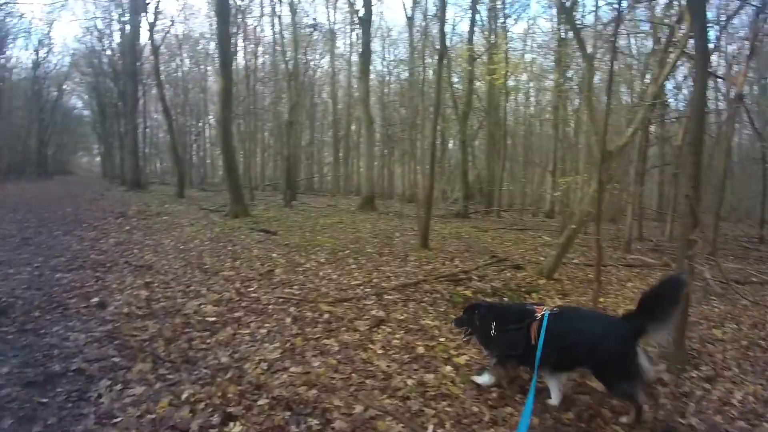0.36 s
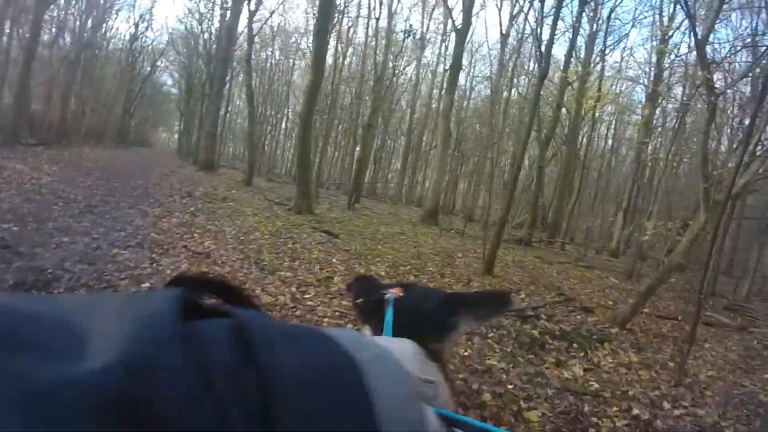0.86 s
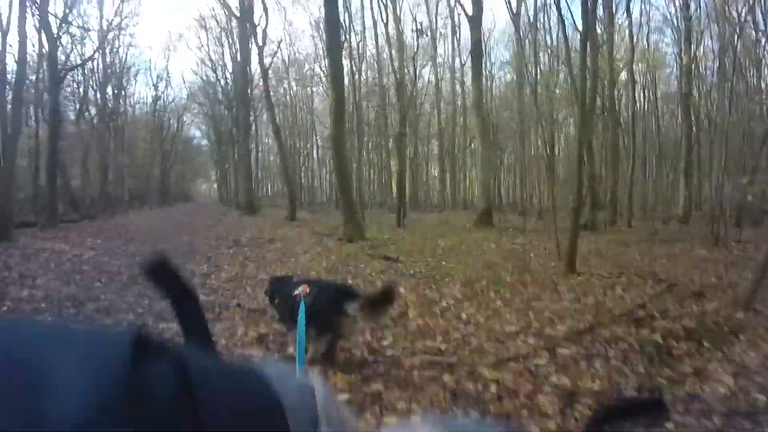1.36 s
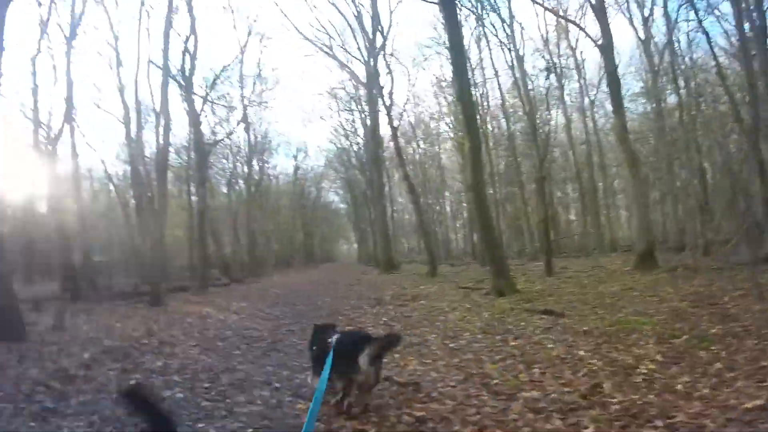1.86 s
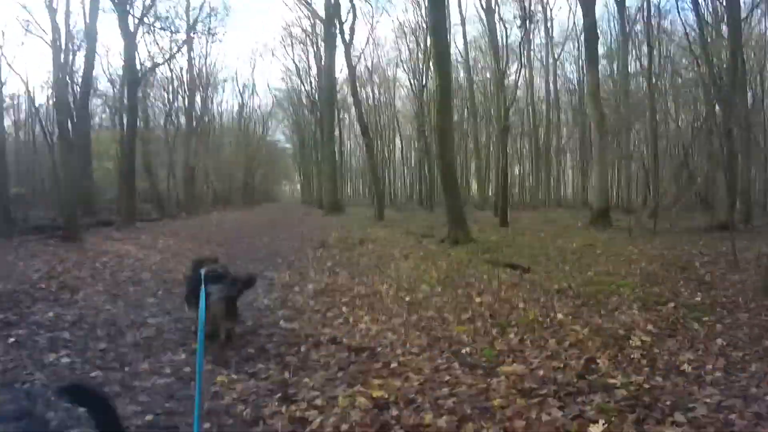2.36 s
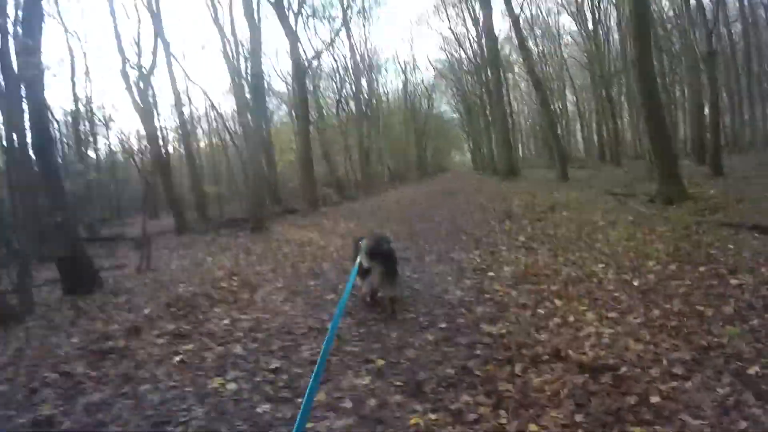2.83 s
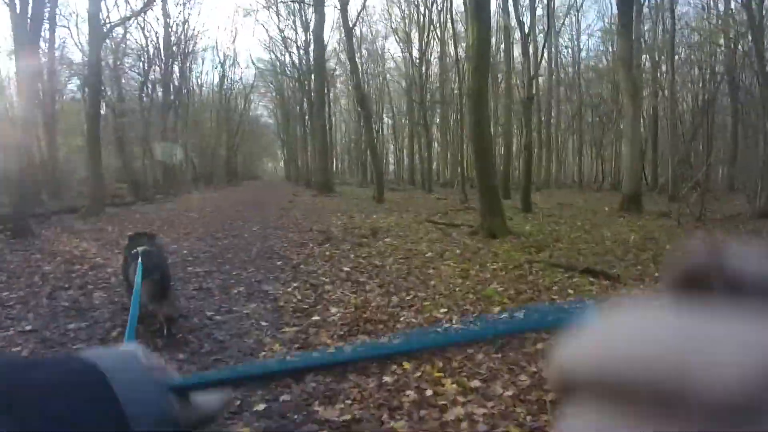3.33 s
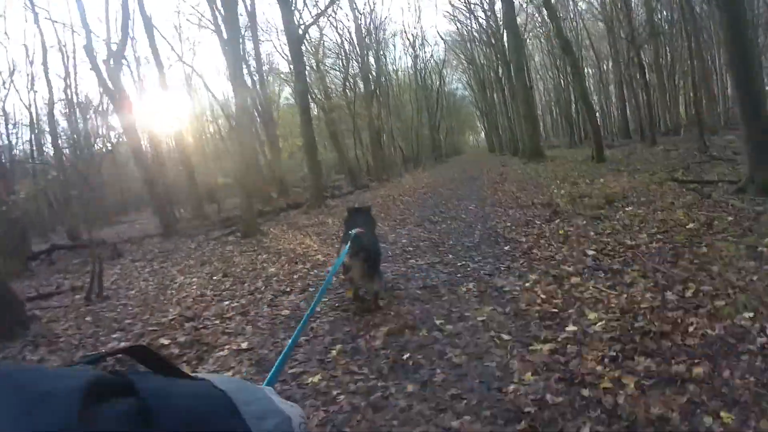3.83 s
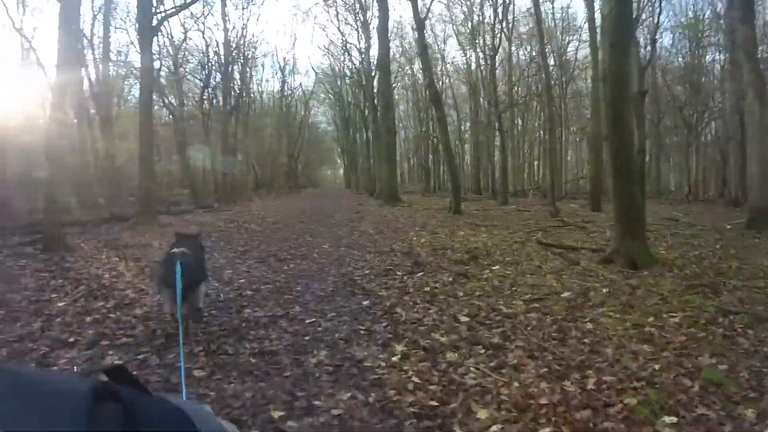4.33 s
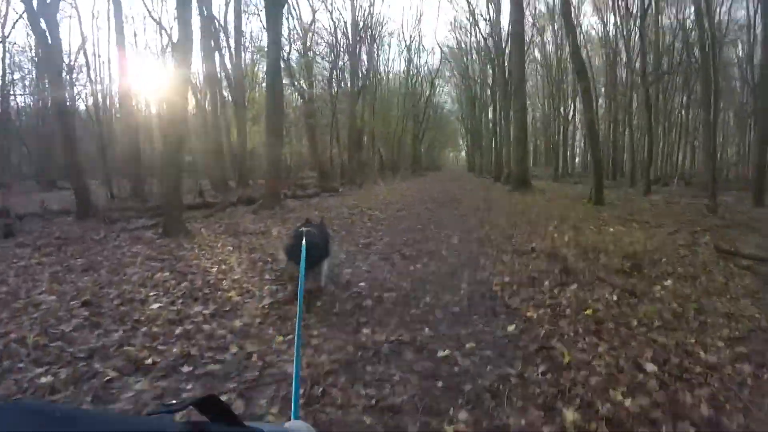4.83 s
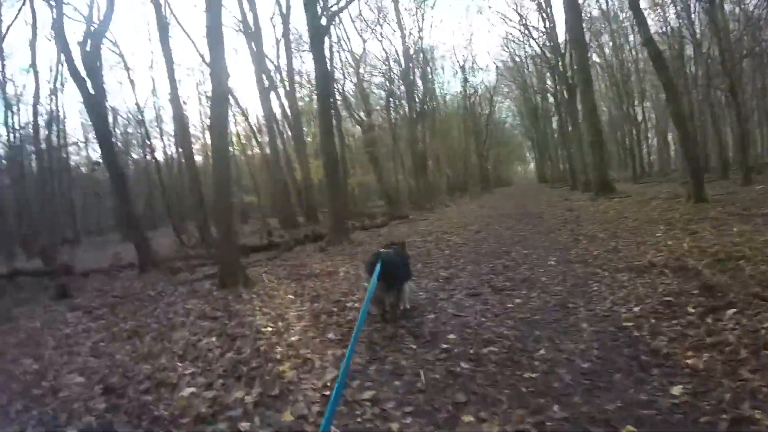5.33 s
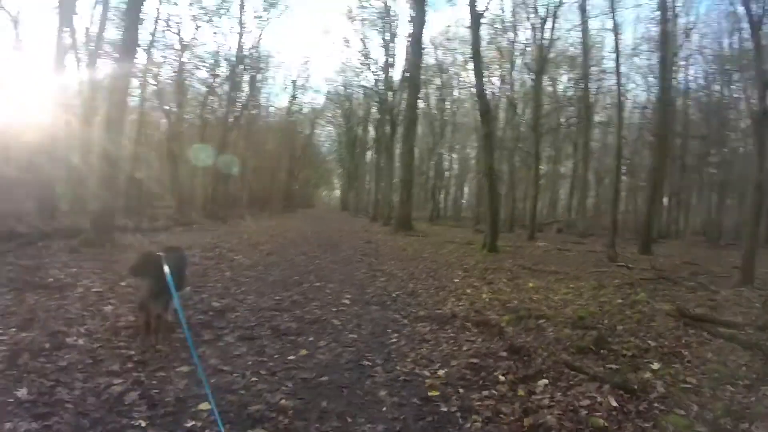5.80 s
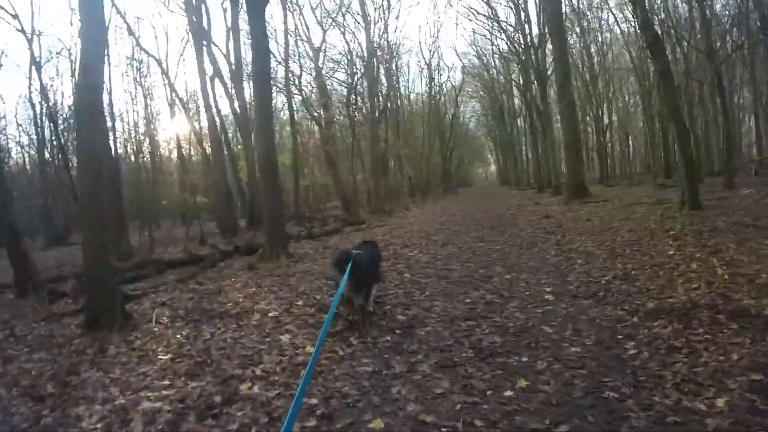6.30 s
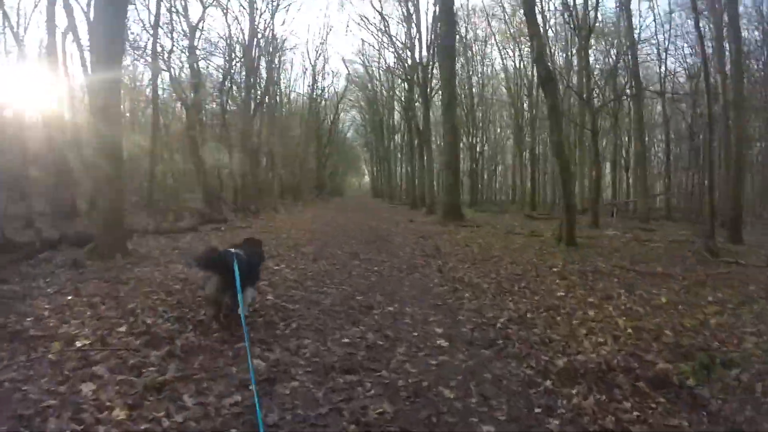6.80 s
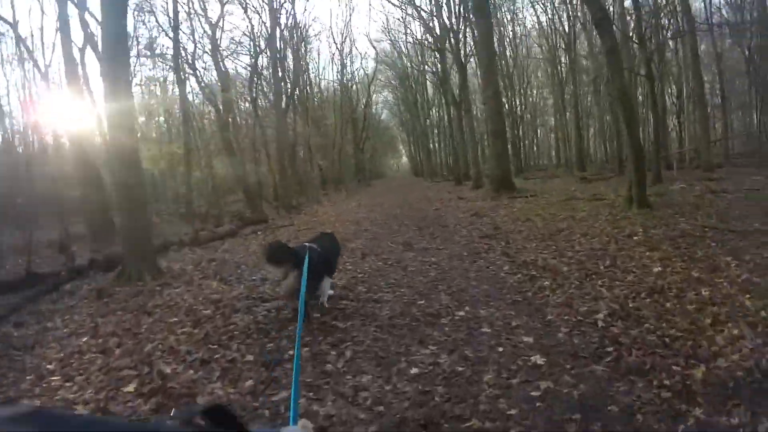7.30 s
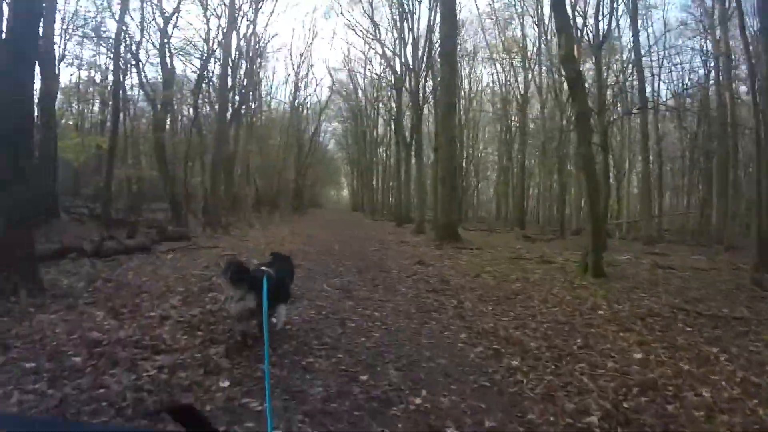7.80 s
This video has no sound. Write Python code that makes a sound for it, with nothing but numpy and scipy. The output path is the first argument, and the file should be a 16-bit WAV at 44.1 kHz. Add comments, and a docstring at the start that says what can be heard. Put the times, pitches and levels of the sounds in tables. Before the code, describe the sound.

Very close, boxy sound from a cased microphone on a jogger's chest. Light ticks and a soft leaf scuff come first, then irregular strides with dry rustling, clothing friction, hard plastic knocks and low thumps. Later strides are louder and crunchier, with a few sharp clipped cracks. Faint woodland air, hiss and an extremely thin high whine lie underneath. The dog ahead is not heard.

```python
"""Woodland floor of dry leaves: someone jogs behind an unheard dog, a small camera in a plastic case on the chest.
Knocks and snaps are ragged noise pushes, leaf and cloth scuffs are clumped noise; both ring the case wall.
Dull bumps are short low sines, and each stride lands as one deep swing over a rumble.
Faint air, hiss and a thin high whine lie beneath; the hardest knocks overload the input."""
import sys
import numpy as np
from scipy import signal
from scipy.fft import rfft, irfft, next_fast_len
from scipy.io import wavfile
from scipy.ndimage import uniform_filter1d

SR = 44100
rng = np.random.default_rng(int(sys.argv[2]) if len(sys.argv) > 2 else 0)


def attenuation_scalar(level_db):
    """Turn a level in dB into a linear amplitude multiplier (20 dB per decade)."""
    decades = np.asarray(level_db, float) / 20
    return 10 ** decades


def to_wav(s):
    """Save 16-bit WAV."""
    ch = np.atleast_2d(s).T  # columns
    pcm = np.round(np.clip(ch, -1, 1) * 32767)  # PCM
    wavfile.write(sys.argv[1], SR, pcm.astype(np.int16))


N = 359856

# Resonances of the case wall. Each row: frequency in Hz, width in Hz, level in dB.
WALL_MODES = [(304, 45, -5), (569.3, 58, 1), (825, 98, 5), (1384, 36, -7), (1823, 38, -3.5),
              (1992, 255, -4.5), (2526, 100, -5), (2969, 85, -2.5), (3790, 300, -12), (4350, 79, -23),
              (5030, 190, -18), (5850, 360, -16), (6330, 140, -16), (7200, 200, -23), (9100, 830, -19.5),
              (11050, 960, -22.5)]
# What the wall passes between its resonances. Each row: frequency in Hz, level in dB.
WALL_FLOOR = [(60, -15.5), (150, -9), (450, -11), (1100, -4.5), (1600, -21), (3100, -8.5), (3350, -34),
              (4400, -8.5), (4800, -24), (7000, -25.5), (7600, -49), (11300, -13), (12200, -73),
              (16000, -83)]
# Frequencies in Hz where the five regions of the wall meet.
REGION_EDGES_HZ = (450, 1500, 3300, 7000)

# Knocks and snaps. Each row: start in seconds, clack peak in dB, knock peak in dB against the clack,
# tick peak in dB against the clack, fall to 1/e in ms.
KNOCKS = [(0.3474, -21.5, -13.5, -15, 1.7), (0.3923, -32, -9, -6, 2.2), (0.4594, -35.5, -4, -10, 1.8),
          (0.5387, -22.5, -9, -17, 2.7), (0.6005, -26, -14, -16, 1.3), (0.7555, -22, 9, -22, 5.4),
          (0.851, -4.5, 0.5, -19, 2.8), (0.97, -12.5, -8, -13, 4), (1.0713, -26, 5.5, -19, 1.7),
          (1.1198, -24.5, -7, -10, 1.6), (1.1847, -13, -1, -24, 2.9), (1.2121, -20.5, 0, -16, 2.2),
          (1.2346, -18.5, -9, -22, 1.2), (1.3118, -34, 2, -12, 2.2), (1.3484, -24, -18, -22, 2.2),
          (1.4851, -14.5, -11, -9.5, 1.9), (1.5075, -12, -17, -14, 1.7), (1.5291, -17, -8, -19, 1.9),
          (1.7578, -16.5, -10, -11, 3.4), (1.8332, -11, -11, -19, 5.4), (1.9946, -15.5, -6, -11, 0.73),
          (2.0248, -23, -7, -4, 2), (2.0462, -30, -10, 2, 2.2), (2.0819, -9, -6, -16, 1.7),
          (2.1108, -16, -0.5, -12, 2.2), (2.1354, -23, 1, -8, 1.8), (2.1581, -12.5, 0, -8, 1.8),
          (2.2561, -3.5, -13, -13.5, 2.4), (2.3134, -18.5, 1, -25, 3.8), (2.364, -15.5, 0.5, -12, 1.9),
          (2.39, -18.5, -8, -8, 2.2), (2.6617, -15, -14, -16, 2.4), (2.6752, -17, -2, -26, 2.8),
          (2.7002, -13, -3, -23, 1.8), (2.7266, -16.5, -9, -13, 1.2), (2.7566, 0, 0.5, -6, 1.8),
          (2.795, -6.5, -0.5, -12, 2.4), (2.8145, -17, -9, -20, 2.2), (2.9908, -22.5, -11, -12, 2.2),
          (3.0689, -18, 2, -13, 2.9), (3.0937, -8.5, -8, -10.5, 4), (3.1357, -7.5, -6.5, -11.5, 3.1),
          (3.2017, -12, -6, -14.5, 3.7), (3.2306, -17.5, -1, -12, 3.6), (3.252, -19, -3, -16, 2.2),
          (3.3578, -15, 0.5, -15, 2.4), (3.4066, -14, -5.5, -27, 1.8), (3.5224, -13.5, -6.5, -26, 2.2),
          (3.681, -27, 3, -5, 3.5), (3.701, -12.5, 0, -8.5, 3.5), (3.73, -21, -4, -24, 2.9),
          (3.7664, -19.5, -15, -13, 1.9), (3.8548, -17, -22, -26, 2.4), (3.9851, -17.5, -24, -18, 2.2),
          (4.1115, -13.5, -3.5, -7.5, 4.5), (4.2423, -26.5, 1, -20, 2.4), (4.3577, -3.5, 0, -14.5, 2.5),
          (4.4156, -11.5, -17, -25, 2.2), (4.5438, -17.5, 2.5, -10, 2.5), (4.568, -12.5, -14, -26, 1.3),
          (4.633, -18.5, 0.5, -9.5, 2.2), (4.8276, -28, -4, -25, 2.2), (4.8519, -17, -5, -13, 2.2),
          (4.8693, -17.5, -5, -7.5, 2.8), (4.9171, 7, -8.5, -8, 0.97), (4.966, -22, 4, -19, 3.7),
          (4.9898, -15.5, -8, -13, 2.5), (5.0064, -6.5, -2.5, -15, 2.2), (5.0346, 4.5, -4, -15, 0.88),
          (5.1427, -11, -7.5, -9.5, 2.4), (5.1673, -16.5, -3.5, -11.5, 2.2), (5.2874, -14.5, -0.5, -24, 4),
          (5.3363, -18.5, -14, -26, 1.3), (5.3971, -9.5, -9, -13, 6.6), (5.435, -18.5, -2, -11, 2),
          (5.4551, -8.5, -10, -13, 3.5), (5.65, -13, -5.5, -27, 2), (5.8175, -8, -4, -15, 1.6),
          (5.8328, -15.5, -9, -16, 3.5), (5.8591, -19.5, -1, -14, 2.8), (5.9366, -11.5, -6, -15, 1.6),
          (5.9779, -13, -13, -19, 2.1), (6.1623, -19.5, -17, -10.5, 3.9), (6.2437, -12, -6.5, -8, 1.4),
          (6.2753, -19, -16, -18, 2), (6.356, -20.5, 6, -7.5, 2.9), (6.5142, -28, -2, -14, 1.6),
          (6.573, -10, -8, -21, 0.82), (6.6733, -17, -2, -17, 2.6), (6.6839, -7.5, -7, -12, 2.2),
          (6.6967, -3.5, -4, -12, 2), (6.7048, -9, -0.5, -21, 2.2), (6.7235, -6.5, -5, -17, 3.1),
          (6.757, -12.5, 1, -19, 2.6), (6.843, -16.5, -2, -6, 2.9), (7.0447, -18, -9, -17, 2.4),
          (7.0575, -15, -1.5, -11, 2.5), (7.0689, -13, -4, -14, 2.2), (7.1247, 3, 2.5, -2.5, 2),
          (7.1556, -16, -9, -14, 2.6), (7.163, -10, -6, -13, 4.5), (7.178, -18.5, -1, -8, 2.2),
          (7.2145, -13, -3, -12, 1.5), (7.256, -14, -7, -15, 2.2), (7.335, -28, -2, -26, 1.8),
          (7.4819, -15.5, -6, -9, 3.4), (7.648, -9.5, -3.5, -12, 5.3), (7.9618, -16.5, -4, -14, 4),
          (8.0408, 3, 0.5, -5, 2.8), (8.074, -14, -5, -7, 3.3), (8.105, -11.5, 2, -2, 2.6)]
KNOCK_RISE_MS, KNOCK_PEAK_MS = 0.73, 0.85  # Gaussian swell; its top this long after the listed start

# Dull bumps of the case against the chest. Each row: time in seconds (onset is 4 ms earlier),
# level in dB ahead of the envelope.
THUDS = [(0.76, -12.5), (0.854, -13), (0.932, -14.5), (0.974, -26), (1.188, -31), (1.483, -17.5),
         (1.84, -33), (2.262, -12.5), (2.401, -26), (2.759, -10), (2.804, -8.5), (3.092, -13.5),
         (3.253, -15.5), (3.395, -17), (3.599, -28), (3.705, -19), (3.962, -17), (4.039, -12.5),
         (4.36, -9.5), (4.543, -12.5), (4.922, -4), (4.968, -13), (5.039, -3), (5.145, -16), (5.301, -23),
         (5.707, -20), (6.182, -19), (6.241, -16), (6.708, -11), (6.758, -13), (6.844, -17), (7.128, -3.5),
         (7.315, -20), (8.015, -12.5), (8.046, -6.5)]
THUD_HZ_AT_MINUS_17_DB, THUD_HZ_PER_DB, THUD_SPREAD_HZ = 304, 4.5, 10  # harder bumps sound higher
THUD_RISE_S, THUD_FALL_S = 0.00043, 0.0042

# Scuffs of leaves and cloth. Each row: top in seconds, rustle in dB, low body in dB,
# rustle rise over 20 dB in ms, rustle fall over 20 dB in ms.
SCUFFS = [(0.541, -44, -41, 140, 900), (0.848, -33.5, -32, 90, 37), (0.925, -37, -36.5, 25, 201),
          (1.08, -37.5, -37, 12, 200), (1.239, -31, -28.5, 198, 16), (1.344, -30.5, -30, 45, 189),
          (1.512, -32, -32, 66, 41), (1.693, -36, -34, 204, 292), (1.844, -30.5, -33, 35, 68),
          (2.102, -28, -26, 134, 140), (2.257, -31.5, -30, 67, 53), (2.377, -35.5, -29, 127, 82),
          (2.563, -39.5, -35, 177, 104), (2.681, -30.5, -26.5, 53, 123), (2.803, -33, -31.5, 135, 59),
          (2.87, -38.5, -36, 25, 400), (3.082, -33, -32, 60, 23), (3.153, -41.5, -36, 53, 340),
          (3.3, -59, -30.5, 100, 104), (3.365, -27.5, -28.5, 18, 300), (3.485, -30.5, -32.5, 294, 16),
          (3.584, -25, -28.5, 106, 11), (3.615, -45, -28.5, 52, 44), (3.751, -50, -43, 102, 400),
          (3.896, -33.5, -31, 310, 231), (4.045, -38, -32.5, 21, 196), (4.08, -33, -32.5, 96, 15),
          (4.122, -37, -31, 20, 20), (4.355, -39, -34, 148, 121), (4.462, -29, -28, 42, 53),
          (4.557, -27, -28, 41, 59), (4.62, -37.5, -33, 50, 302), (4.893, -33, -31.5, 113, 9),
          (5.015, -33, -27, 143, 45), (5.156, -41, -36, 246, 148), (5.301, -26.5, -26, 48, 55),
          (5.405, -35, -31, 193, 300), (5.512, -42, -38, 300, 393), (5.699, -23, -28, 91, 37),
          (5.834, -34.5, -31.5, 97, 84), (5.991, -35.5, -34, 105, 147), (6.169, -32.5, -31, 85, 103),
          (6.251, -34, -31.5, 93, 63), (6.357, -38.5, -35.5, 81, 46), (6.584, -24.5, -25.5, 70, 43),
          (6.702, -31, -30.5, 95, 234), (7.062, -25, -26.5, 71, 50), (7.176, -32.5, -29.5, 154, 227),
          (7.425, -30, -33.5, 15, 383), (7.505, -35.5, -35, 294, 15), (7.554, -26, -32.5, 57, 3),
          (7.612, -37.5, -35.5, 19, 150), (7.7, -51, -40, 102, 293), (7.982, -36, -34, 149, 1000)]
# Faint rustle between the scuffs. Each row: time in seconds, level in dB.
BED = [(0, -59), (0.43, -57.5), (0.6, -57), (4, -67.5), (8.16, -51.5)]
BED_BODY_OVER_RUSTLE_DB = 4.5
BODY_DB_PER_RUSTLE_DB = 0.76  # within a scuff
HISS_DB_AT_MINUS_33_DB, HISS_DB_PER_RUSTLE_DB = -46.5, 0.99

# Landings of the strides. Each row: middle of the swing in seconds, peak in dB.
LANDINGS = [(1.099, -36), (1.364, -29.5), (1.413, -25), (2.288, -31.5), (2.674, -40), (2.727, -26),
            (3.125, -38), (3.592, -33), (3.707, -33.5), (3.989, -27), (4.555, -33), (4.905, -32.5),
            (5.022, -38), (5.28, -34.5), (5.333, -29.5), (5.752, -26.5), (6.207, -35.5), (6.632, -32),
            (7.126, -37.5), (7.545, -31), (8.042, -31)]
LANDING_HZ, LANDING_SPREAD_HZ = 35.3, 9.9
# Rumble between landings. Each row: frequency in Hz, relative level in dB per Hz.
RUMBLE_SPECTRUM = [(11, -30), (18, -14.5), (87, 10.5), (200, -4), (260, -31), (440, -120)]

# Still woodland air and input hiss. Each row: frequency in Hz, relative level in dB per Hz.
AIR_SPECTRUM = [(15, -32), (25, 11), (199, -1), (418, -10), (622, -19), (903, -19), (1120, -9), (1270, -37),
                (2060, -12), (2750, -22), (3230, -16), (14300, -28.5)]
AIR_RMS_DB = -54
WHINE_BASE_HZ, WHINE_PEAK_DB, WHINE_CYCLES_PER_S = 15003, -71, 14.985


def evened(x):
    """Scales to rms 1."""
    return x / np.sqrt(np.mean(x ** 2) + 1e-20)


def read(points, hz):
    """Reads a (Hz, dB) curve along a log frequency axis."""
    point_hz, db = np.transpose(points)
    return np.interp(np.log(hz + 1), np.log(point_hz + 1), db)


def coloured(points):
    """Steady noise of rms 1 with the given spectrum."""
    size = next_fast_len(N)
    gain = attenuation_scalar(read(points, np.fft.rfftfreq(size, 1 / SR)))
    spectrum = rfft(rng.standard_normal(size)) * gain
    return evened(irfft(spectrum, size)[:N])


def drift(seconds):
    """Slow random wander of rms 1: noise averaged twice."""
    size = max(round(seconds * SR), 2)
    once = uniform_filter1d(rng.standard_normal(N), size)
    return evened(uniform_filter1d(once, size))


def add(mix, start_s, sound):
    """Adds a sound into the mix in place, cut at the end."""
    part = mix[round(start_s * SR):][:len(sound)]
    part += sound[:len(part)]


def wall_rings(size=8192):
    """Minimum-phase ring of each wall region after one click, energy 1."""
    hz = np.fft.rfftfreq(size, 1 / SR) + 1
    modes = sum(attenuation_scalar(2 * db) / (1 + (2 * (hz - mode_hz) / width_hz) ** 2) ** 1.125
                for mode_hz, width_hz, db in WALL_MODES)
    power = attenuation_scalar(2 * read(WALL_FLOOR, hz)) + modes
    above = [1 / (1 + (edge_hz / hz) ** 12) for edge_hz in REGION_EDGES_HZ]
    above = [np.ones(len(hz))] + above + [np.zeros(len(hz))]
    rings = []
    for low, high in zip(above, above[1:]):
        cepstrum = irfft(np.log(power * (low - high) + 1e-12) / 2)
        cepstrum[1:size // 2] *= 2  # folding puts all sound after the click
        cepstrum[size // 2 + 1:] = 0
        ring = irfft(np.exp(rfft(cepstrum)))[:size // 2]
        rings.append(ring / np.linalg.norm(ring))
    return rings


def knocks(rings):
    """Each contact is a ragged push that swells and crumbles away, ringing the upper four wall regions."""
    out, lead_s = np.zeros(N), 0.02
    ms = (np.arange(2048) / SR - lead_s) * 1000
    rags, crumbs = rng.standard_normal((len(KNOCKS), len(ms), 2)).transpose(2, 0, 1)
    rags = rags * attenuation_scalar(4.1 * evened(uniform_filter1d(crumbs, 40, axis=1)))  # uneven bits
    late_ms = ms - KNOCK_PEAK_MS
    swell = np.exp(-(late_ms / KNOCK_RISE_MS) ** 2)
    for (start_s, clack_db, knock_db, tick_db, fall_ms), rag in zip(KNOCKS, rags):
        shape = np.where(late_ms < 0, swell, np.exp(-abs(late_ms) / max(fall_ms, 0.1)))
        push = rag * shape
        hard_push = rag * shape ** 1.5  # treble only while the push is hard
        knock, clack = (signal.fftconvolve(push, ring) for ring in rings[1:3])
        tick, top = (signal.fftconvolve(hard_push, ring) for ring in rings[3:])
        bright = tick + attenuation_scalar(0.25 * tick_db - 18.5) * top  # sharper contacts reach higher
        for part, db in ((knock, knock_db), (clack, 0), (bright, tick_db)):
            peak = abs(signal.hilbert(part)).max()
            add(out, start_s - lead_s, attenuation_scalar(clack_db + db) * part / peak)
    return out


def thuds():
    """Soft bump: a few low sine cycles, quick to rise and to die."""
    out, t = np.zeros(N), np.arange(2048) / SR
    shape = (1 - np.exp(-t / THUD_RISE_S)) * np.exp(-t / THUD_FALL_S)
    for (time_s, db), (phase_cycles, chance) in zip(THUDS, rng.random((len(THUDS), 2))):
        hz = THUD_HZ_AT_MINUS_17_DB + THUD_HZ_PER_DB * (db + 17)
        hz = hz + THUD_SPREAD_HZ * (2 * chance - 1)
        add(out, time_s - 0.004, attenuation_scalar(db) * shape * np.sin(2 * np.pi * (hz * t + phase_cycles)))
    return out


def drag():
    """Levels in dB of rustle, body and hiss: powers of all scuffs added over the bed."""
    t = np.arange(0, N + 64, 64) / SR
    top_s, top_db, body_top_db, rise_ms, fall_ms = np.transpose(SCUFFS)[:, :, None]
    away_ms = 1000 * (t - top_s)
    bed_db = np.interp(t, *np.transpose(BED))
    rising = -away_ms / np.maximum(rise_ms, 10)
    falling = away_ms / np.maximum(fall_ms, 10)
    down_db = 20 * np.where(away_ms < 0, rising, falling)

    def total_db(scuffs_db, under_db):
        power = attenuation_scalar(2 * scuffs_db).sum(0) + attenuation_scalar(2 * under_db)
        return np.interp(np.arange(N) / SR, t, 10 * np.log10(power))

    rustle_db = total_db(top_db - down_db, bed_db)
    body_db = total_db(body_top_db - BODY_DB_PER_RUSTLE_DB * down_db, bed_db + BED_BODY_OVER_RUSTLE_DB)
    hiss_db = HISS_DB_AT_MINUS_33_DB + HISS_DB_PER_RUSTLE_DB * (rustle_db + 33)
    return rustle_db, body_db, hiss_db


def rustle(rings):
    """Clumps of tiny snaps over a smooth scrape ring all five wall regions, following the drag of each stride."""
    rustle_db, body_db, hiss_db = drag()
    clumps = attenuation_scalar(4.5 * drift(0.006))
    snap_size = attenuation_scalar(2.85 * np.minimum(rng.exponential(1, N), 3))
    snaps = (rng.random(N) < 700 / SR * clumps) * snap_size
    fray = np.exp(-np.arange(300) / (0.0025 * SR))
    crumbs = signal.oaconvolve(snaps, fray)[:N]
    shared, own = rng.standard_normal((2, N))
    scrape = evened(attenuation_scalar(5.0 * drift(0.029)) * own)
    drive = evened(crumbs * shared) + 0.71 * scrape
    # cloth on the chest has less edge
    lumps = 0.68 * drive + evened(attenuation_scalar(2.8 * drift(0.011)) * rng.standard_normal(N))
    fizz = 0.39 * drive + evened(attenuation_scalar(7.9 * drift(0.0018)) * rng.standard_normal(N))
    layers = ((lumps, body_db), (drive, body_db - 4.5), (drive, rustle_db),
              (drive, hiss_db), (fizz, hiss_db - 16.0))  # lowest region first
    return sum(signal.oaconvolve(attenuation_scalar(db) * evened(x), ring)[:N]
               for (x, db), ring in zip(layers, rings))


def jolts():
    """Each landing shakes the case in one deep swing, over a rumble that follows the drag."""
    body_db = drag()[1]
    out = attenuation_scalar(body_db - 9.0 + 2.0 * drift(0.018)) * coloured(RUMBLE_SPECTRUM)
    t, lead_s = np.arange(-4096, 4096) / SR, 4096 / SR
    for (middle_s, db), chance in zip(LANDINGS, rng.uniform(-1, 1, len(LANDINGS))):
        hz = LANDING_HZ + LANDING_SPREAD_HZ * chance
        swing = np.exp(-(t * hz / 1.1) ** 2) * np.cos(2 * np.pi * hz * t)
        add(out, middle_s - lead_s, -attenuation_scalar(db) * swing)
    return out


def background():
    """Air and hiss as shaped noise; a thin electronic tone dips twice a cycle and redraws its pitch in each dip."""
    cycle = np.arange(N) / SR * WHINE_CYCLES_PER_S
    gain = np.interp(cycle % 1, (0, .12, .15, .25, .28, .68, .72, .88, .92, 1),
                     (1, 1, .2, .2, 1, 1, .3, .3, 1, 1))
    offsets_hz = rng.choice([-50., -25., 0., 20., 45., 80., 160., 250.], round(2 * cycle[-1]) + 2)
    hz = WHINE_BASE_HZ + offsets_hz[(2 * cycle + 0.5).astype(int)]
    whine = gain * np.sin(2 * np.pi * np.cumsum(hz) / SR)
    return attenuation_scalar(AIR_RMS_DB) * coloured(AIR_SPECTRUM) + attenuation_scalar(WHINE_PEAK_DB) * whine


def scene():
    """All sources summed at the one microphone."""
    rings = wall_rings()
    return (knocks(rings) + thuds() + rustle(rings) + jolts() + background())[None]


def low_pass(x):
    """Removes everything above the highest recorded frequency."""
    return signal.sosfilt(signal.butter(12, 15990, fs=SR, output="sos"), x)


def record(dry):
    """A limiter acts just after the loudest knocks; their first swings still bend over and clip."""
    peak_db = 20 * np.log10(abs(dry[0]) + 1e-9)
    release_db = np.arange(N) * 370.0 / SR  # the tracked peak falls 370 dB a second
    tracked_db = np.maximum.accumulate(peak_db + release_db) - release_db
    over_db = np.maximum(tracked_db + 7, 0)
    late_db = signal.lfilter([0.01], [1, -0.99], over_db)  # needs about 2 ms to act
    held = dry / attenuation_scalar(0.48 * late_db)
    knee = 1.042 * held / (1 + abs(held) ** 4) ** 0.25
    lowpass = signal.firwin(801, 15330, window=("kaiser", 8), fs=SR)  # edge in Hz
    limited = signal.oaconvolve(knee, lowpass[None], "same")
    return low_pass(np.clip(limited, -1, 1))


dry = scene()
out = record(dry)
to_wav(out)
```